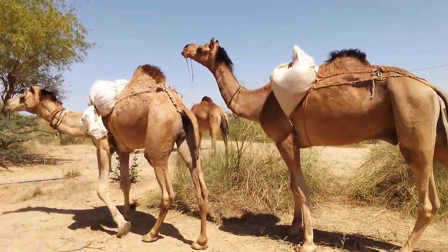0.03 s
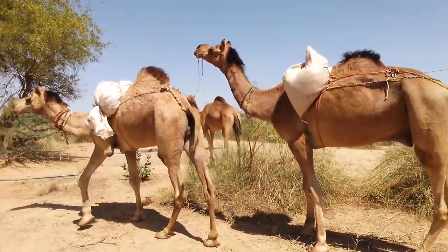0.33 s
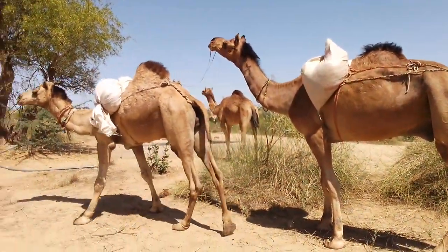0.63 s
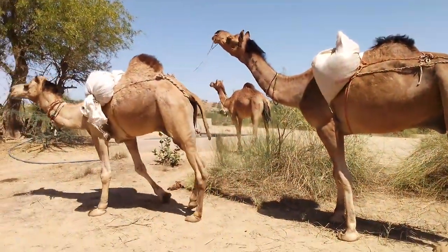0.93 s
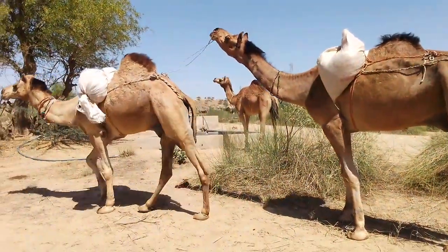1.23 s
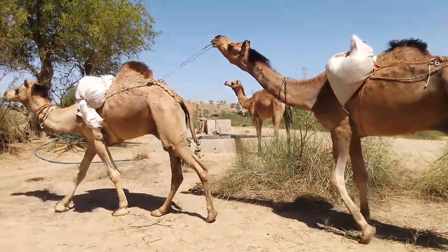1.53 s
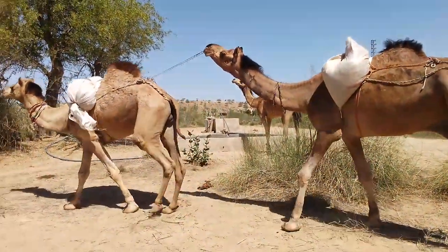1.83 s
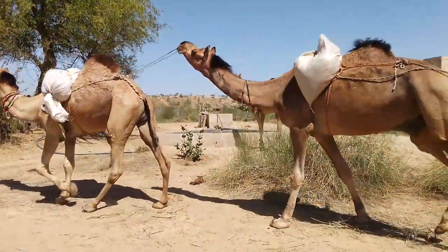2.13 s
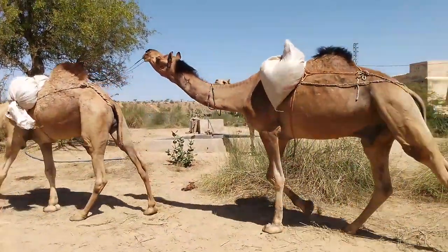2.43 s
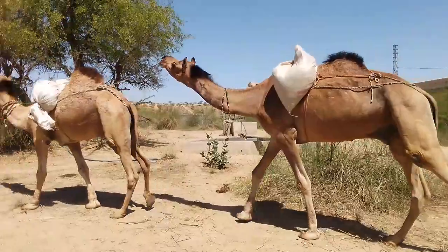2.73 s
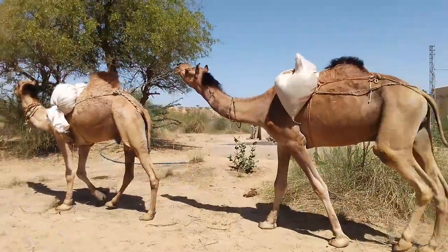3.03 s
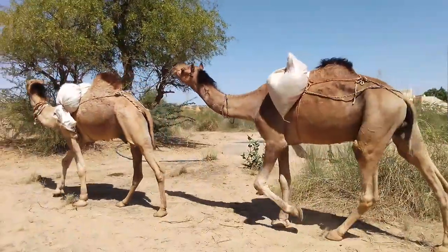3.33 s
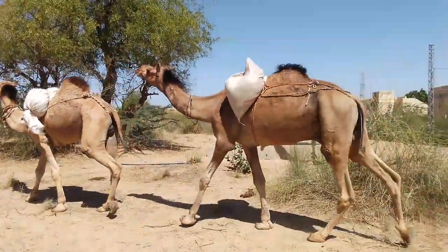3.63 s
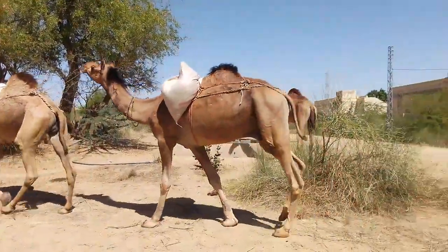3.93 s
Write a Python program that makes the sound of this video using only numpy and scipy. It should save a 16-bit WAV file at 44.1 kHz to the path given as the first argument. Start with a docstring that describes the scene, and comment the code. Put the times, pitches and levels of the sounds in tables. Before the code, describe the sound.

Wind blows against the microphone in uneven gusts, over faint clicks from walking camels.

```python
"""Gusty wind buffets a phone microphone while camels walk past on sand and dry grass.
Turbulent eddies beat on the microphone port: the faster the air, the louder and brighter they are.
Twice the wind drops away. Behind it lie a faint wash of air, a hiss of sand, scuffing feet,
a few dry clicks of twigs and harness, and the gliding whistles of a small bird."""
import sys
import numpy as np
from scipy import signal
from scipy.fft import rfft, irfft, next_fast_len
from scipy.io import wavfile
from scipy.ndimage import uniform_filter1d, minimum_filter1d, map_coordinates

SR = 44100
rng = np.random.default_rng(int(sys.argv[2]) if len(sys.argv) > 2 else 0)


def int16_out(signal):
    """Quantize to a 16-bit WAV file."""
    q = np.round(np.clip(np.atleast_2d(signal).T, -1, 1) * 32767)
    wavfile.write(sys.argv[1], SR, q.astype(np.int16))


N = 176400
T = np.arange(N) / SR


def undb(db):
    """Amplitude ratio: tenfold for every 20 dB."""
    return 10 ** (np.asarray(db) / 20)


def unit(x):
    """Normalisation to rms 1."""
    return x / np.sqrt(np.mean(x ** 2))


def response(points, size):
    """Magnitude response through (Hz, dB) points, interpolated in log frequency."""
    hz, db = np.array(points, float).T
    return undb(np.interp(np.log(np.fft.rfftfreq(size, 1 / SR) + 1), np.log(hz), db))


def colour(x, points):
    """Zero-phase filtering: the spectrum is multiplied by a magnitude response."""
    size = next_fast_len(len(x) + 8192)
    return irfft(rfft(x, size) * response(points, size), size)[:len(x)]


def noise(points, size=N):
    """Spectrally shaped Gaussian noise of rms 1."""
    return unit(colour(rng.standard_normal(size), points))


def impulse(points, size=512):
    """Minimum-phase impulse response of the given spectrum, peak 1."""
    cepstrum = irfft(np.log(response(points, size)))
    cepstrum[1:size // 2] *= 2
    cepstrum[size // 2 + 1:] = 0
    click = irfft(np.exp(rfft(cepstrum)))
    return click / np.abs(click).max()


def wander(hz):
    """Smooth random modulation with a new value hz times a second."""
    return map_coordinates(rng.standard_normal(4096), [T * hz], order=3, mode="wrap")


def bell(at, length):
    """Gaussian envelope, length seconds wide at 1/e of its peak."""
    return np.exp(-(2 * (T - at) / length) ** 2)


def swell_power(rows):
    """Incoherent addition: overlapping swells sum in power."""
    return sum(undb(db) ** 2 * bell(at, length) for at, length, db, *_ in rows)


def ambient_air(level_db=-78):
    """Stationary broadband noise forms the floor of the scene."""
    # Each row: frequency in Hz, relative spectral density in dB.
    spectrum = [(40, -9.5), (300, 3.5), (1000, -9.5), (2200, -9), (3500, -12), (6500, -12), (9000, -19.5),
                (15000, -24)]
    return undb(level_db) * noise(spectrum)


def bird(roughness=.025):
    """Frequency modulation: short whistles glide, roughened by a random waver of pitch."""
    # Each row: start and length in seconds, first and last pitch in Hz, level in dB.
    notes = [(.008, .024, 3095, 1970, -78), (0.03, 0.012, 1909, 2220, -73), (0.093, .028, 3030, 2600, -63),
             (0.12, 0.015, 1860, 2320, -72), (0.221, 0.048, 2410, 2180, -63.5),
             (2.778, 0.026, 3908, 3283, -57), (2.821, 0.024, 3240, 2214, -71.5)]
    out, waver = np.zeros(N), 1 + roughness * wander(470)
    for at, length, start_hz, end_hz, db in notes:
        along = np.clip((T - at) / length, 0, 1)
        hz = (start_hz + (end_hz - start_hz) * along) * waver
        out += undb(db) * np.sin(np.pi * along) * np.sin(2 * np.pi * np.cumsum(hz) / SR)
    return out


def sand_hiss(flicker_db=1.9):
    """Amplitude-modulated noise: the hiss of sand and grass swells and fades."""
    # Each row: peak time and length in seconds, level in dB.
    swells = [(1.958, 0.33, -59), (1.75, 0.95, -73), (3.734, 0.48, -74)]
    # Each row: frequency in Hz, relative spectral density in dB.
    spectrum = [(1200, -8), (2600, 2.5), (3000, -13), (3350, 4), (4000, 4.5), (4350, -18.5), (4850, -6.5),
                (5250, 7), (5700, -14), (6900, -5), (7400, -24.5), (10000, -24), (15000, -45)]
    return noise(spectrum) * undb(flicker_db * wander(40)) * np.sqrt(swell_power(swells))


def scuffing_feet(grain_depth=.5, grain_hz=510):
    """Friction of feet on sand gives noise, made gritty by rapid changes of amplitude."""
    # Each row: peak time and length in seconds, level in dB.
    scuffs = [(1.09, .08, -78), (1.52, 0.16, -72), (1.66, 0.048, -70.5), (1.92, 0.085, -72.5),
              (2.22, 0.085, -67.5), (2.52, 0.6, -83), (3.612, 0.011, -65), (3.712, .025, -69),
              (3.745, 0.022, -71), (3.795, .03, -70)]
    # Each row: frequency in Hz, relative spectral density in dB.
    spectrum = [(1500, -16.5), (4000, -8.5), (6500, 3.5), (8500, -6.5), (11000, -14), (15000, -22)]
    grit = rng.standard_normal(N) * np.exp(grain_depth * wander(grain_hz))
    return unit(colour(grit, spectrum)) * np.sqrt(swell_power(scuffs))


def dry_clicks():
    """Heavily damped transients of twigs and harness: a bright snap and a low knock, with no ring."""
    # Each row: start in seconds, peak of the snap in dB, knock relative to the snap in dB.
    clicks = [(.1543, -47, -9), (1.0295, -41, -12.5), (1.9485, -37, -28.5), (2.781, -26, 1.5),
              (2.914, -65, -13.5), (3.2147, -45.5, -12), (3.487, -52.5, -28.5), (3.703, -49, -25),
              (3.9642, -50, -14.5)]
    # Each row of both: frequency in Hz, relative spectral density in dB.
    snap_spectrum = [(500, -19), (2800, -24), (3700, 3), (5600, 8), (8000, -2), (10000, -15), (12000, -18),
                     (15000, -38.5)]
    knock_spectrum = [(200, -20), (700, 2), (1200, -1), (1900, -3), (2700, -18.5), (8000, -46.5)]
    out, snap, knock = np.zeros(N), impulse(snap_spectrum), impulse(knock_spectrum)
    for at, db, knock_db in clicks:
        start = int(at * SR)
        click = undb(db) * (snap + undb(knock_db) * knock)
        out[start:start + len(click)] += click[:N - start]
    return out


def microphone(pressure):
    """Filters in cascade: the port colours the wind, then the phone's wind filter cuts the bass."""
    # Each row of both: frequency in Hz, gain in dB.
    port = [(250, -4.5), (320, 0), (950, 2.5), (1600, 0), (2650, 1.5), (2900, -5.5), (3100, -10.5),
            (3300, 1), (4000, 4), (4500, -15), (5200, 6), (5900, -5.5)]
    low_cut = [(25, -39.5), (50, -41.5), (85, -26.5), (125, -18.5), (160, -19.5), (205, -8), (265, 1.5)]
    return colour(colour(pressure, port), low_cut)


def airflow(sway_db=1.56, sway_hz=55.18, strong_db=-18):
    """Breeze and buffets add in power; eddy speed is their power-weighted mean, 1 in a strong buffet."""
    # Each row: time in seconds, level of the breeze in dB.
    contour = [(0.0, -48), (0.07, -59), (0.17, -73.5), (0.24, -61.0), (0.33, -28.5), (0.5, -37.5),
               (0.62, -25), (0.9, -23), (1.2, -35), (1.75, -22.5), (2.05, -24.5), (2.3, -34.5), (2.58, -36),
               (2.73, -26), (2.82, -44.5), (2.88, -74), (2.96, -46), (3.07, -28), (3.25, -26), (3.52, -23),
               (3.7, -26.5), (3.85, -20.5), (4.0, -26.5)]
    # Each row: centre and length in seconds, depth of the lull in dB.
    lulls = [(0.596, 0.044, -5.5), (0.974, 0.052, -7.5), (1.123, 0.023, -5), (1.421, 0.034, -7),
             (1.635, 0.044, -5), (1.93, 0.023, -7), (2.064, 0.021, -4), (2.162, 0.024, -7.5),
             (2.306, 0.028, -4), (2.373, 0.019, -4), (2.551, 0.039, -6), (2.776, 0.042, -7), (3.1, .02, -7),
             (3.163, 0.018, -7), (3.318, 0.028, -3.5), (3.63, 0.042, -4.5), (3.701, 0.029, -6)]
    # Each row: peak time and length in seconds, level in dB, relative eddy speed.
    buffets = [(0.323, 0.059, -23, 0.67), (0.375, 0.026, -16, 0.74), (0.424, 0.077, -19.5, 0.68),
               (0.486, 0.022, -15, 1.0), (0.517, 0.014, -19.5, 0.96), (0.527, 0.026, -19.0, 0.81),
               (0.556, 0.048, -21, 0.69), (0.692, 0.019, -19, 0.94), (0.763, 0.008, -26, 0.78),
               (0.895, 0.031, -16, 0.77), (0.931, 0.027, -17, 0.87), (1.028, 0.026, -17, 0.64),
               (1.086, 0.04, -17, 0.72), (1.161, 0.024, -13.5, 1.1), (1.169, 0.0051, -28, 2.07),
               (1.24, 0.017, -18.5, 1.206), (1.284, 0.03, -16.5, 1.245), (1.308, 0.022, -18.5, 1.55),
               (1.33, 0.064, -22, 0.81), (1.382, 0.018, -21, 1.063), (1.488, 0.072, -25.5, 0.45),
               (1.561, 0.022, -17, 0.86), (1.682, 0.013, -17, 0.82), (1.777, 0.011, -21.5, 1.167),
               (1.85, 0.021, -20, 1.225), (1.965, 0.013, -17.5, 1.19), (2.003, 0.036, -20, 0.91),
               (2.094, 0.0087, -17.5, 0.64), (2.129, 0.016, -17, 1.03), (2.191, 0.015, -22, 0.45),
               (2.22, 0.013, -19.5, 0.81), (2.245, 0.031, -18.5, 0.65), (2.349, 0.022, -24.5, 0.55),
               (2.422, 0.035, -19.5, 0.63), (2.48, 0.015, -20, 0.77), (2.509, 0.016, -22.5, 0.7),
               (2.647, 0.028, -18.5, 0.73), (2.668, 0.01, -20.5, 1.077), (2.705, 0.011, -21.5, 0.45),
               (2.806, 0.0081, -24.5, 0.64), (3.074, 0.017, -19.5, 0.56), (3.12, 0.015, -18.5, 0.64),
               (3.148, 0.013, -16.5, 0.59), (3.192, 0.023, -20.5, 0.45), (3.233, 0.047, -24.5, 0.7),
               (3.29, 0.024, -17, 1), (3.352, 0.011, -15, 0.92), (3.38, 0.015, -16, 1.13),
               (3.393, 0.01, -18.5, 1.21), (3.415, 0.035, -21, 1.4), (3.482, 0.08, -24, 0.43),
               (3.582, 0.0081, -18.5, 0.89), (3.667, 0.011, -19, 1.18), (3.797, 0.0083, -21.5, 0.67),
               (3.891, 0.014, -19, 1.236), (3.921, 0.027, -15.5, 1.405), (3.969, 0.0083, -21.5, 0.72)]
    lull_db = sum(db * bell(at, length) for at, length, db in lulls)
    breeze = undb(np.interp(T, *np.array(contour).T) + lull_db + sway_db * wander(sway_hz))
    power = breeze ** 2 + swell_power(buffets)
    breeze_speed = .27 + .43 * (breeze / undb(strong_db)) ** .4  # rises with pressure
    focus = .28  # a buffet is fastest at its peak and slows towards its flanks
    buffet_rush = sum(speed * undb(db) ** 2 * bell(at, length) ** (1 + focus)
                      for at, length, db, speed in buffets)
    return power, (breeze_speed * breeze ** 2 + buffet_rush) / power


def wind(gain_db=.5, flutter_db=2.5, flutter_hz=250.7, notch_hz=164.6, notch_q=4.8):
    """Frozen turbulence: a fixed eddy pattern sweeps over the port, so frequency scales with speed."""
    # Each row: frequency in Hz at eddy speed 1, relative spectral density of pressure in dB.
    spectrum = [(60, 1.5), (350, 6), (600, 1), (950, -5.5), (1400, -14.5), (2000, -27), (2800, -34.5),
                (4000, -51), (6000, -64), (10000, -92)]
    power, speed = airflow()
    flutter = undb(flutter_db * wander(flutter_hz))
    travel = np.cumsum(speed * flutter ** .34)  # flutter also hurries the eddies
    pattern = noise(spectrum, size=2 * N)
    eddies = map_coordinates(pattern, [travel], order=3, mode="wrap") * flutter
    # Dividing by the short-term filtered power lets the airflow set the loudness.
    eddy_power = uniform_filter1d(uniform_filter1d(microphone(eddies) ** 2, size=500), size=500)
    pressure = microphone(undb(gain_db) * eddies * np.sqrt(power / eddy_power))
    return signal.filtfilt(*signal.iirnotch(notch_hz, notch_q, fs=SR), pressure)


def scene():
    """Superposition, in mono, of the wind and the quiet sounds behind it."""
    return (wind() + dry_clicks() + scuffing_feet() + sand_hiss() + bird() + ambient_air())[None]


def record(dry):
    """Peak limiting in the phone holds down the hardest buffets; a low-pass cuts the top."""
    ceiling, cutoff_hz = .46, 15700
    gain = np.minimum(1, ceiling / (np.abs(dry) + 1e-9))
    held_gain = minimum_filter1d(gain, size=400)
    smooth_gain = uniform_filter1d(uniform_filter1d(held_gain, size=200), size=200)
    low_pass = signal.ellip(8, .2, 70, cutoff_hz, fs=SR, output="sos")
    return signal.sosfilt(low_pass, dry * smooth_gain)


dry = scene()
out = record(dry)
int16_out(out)
```